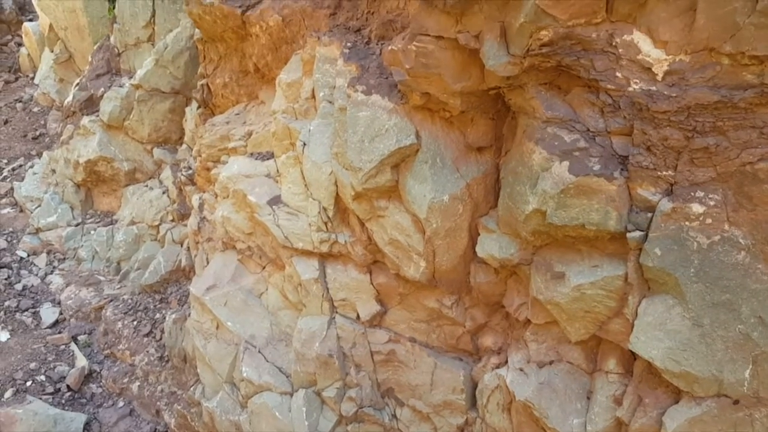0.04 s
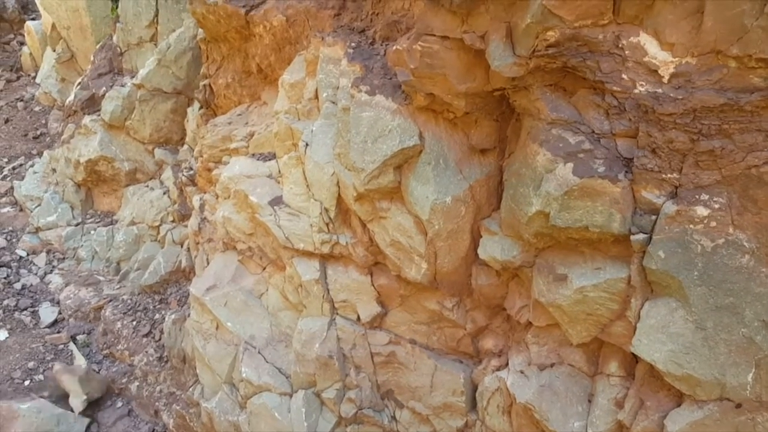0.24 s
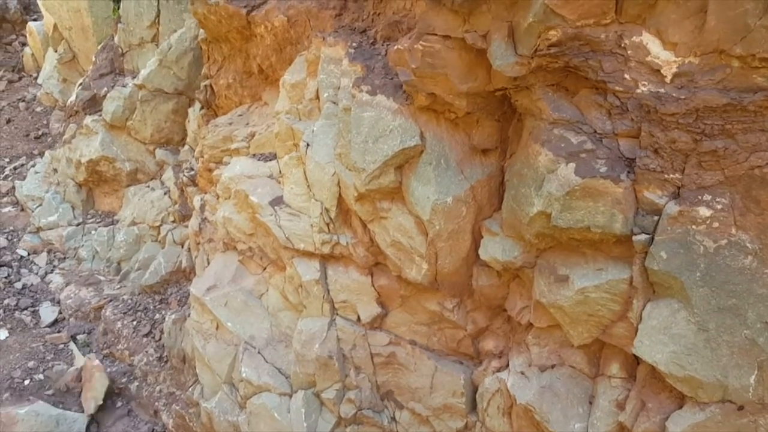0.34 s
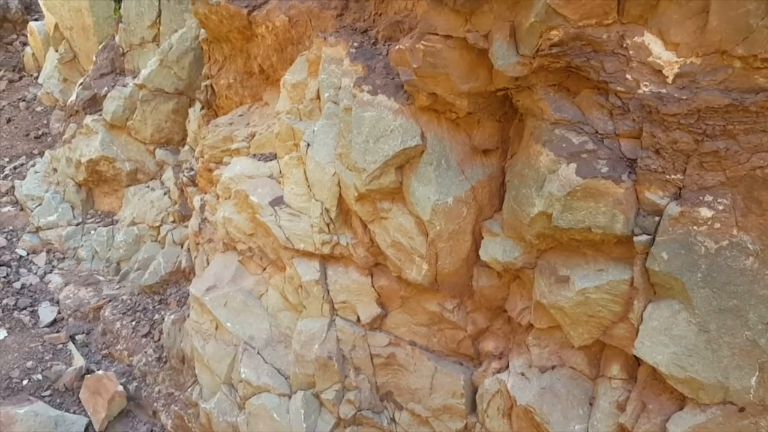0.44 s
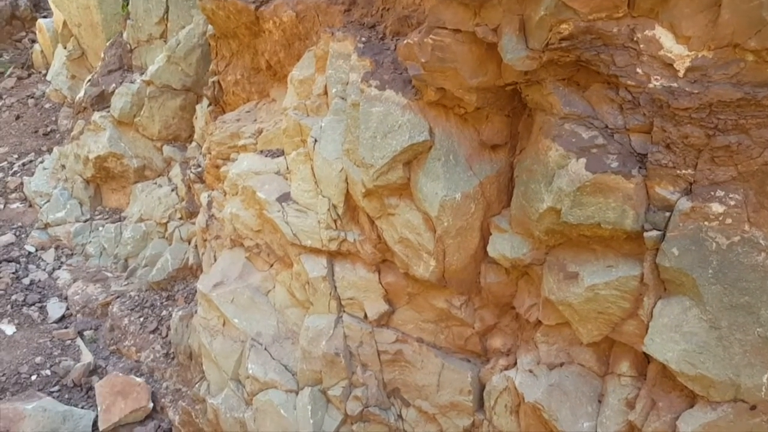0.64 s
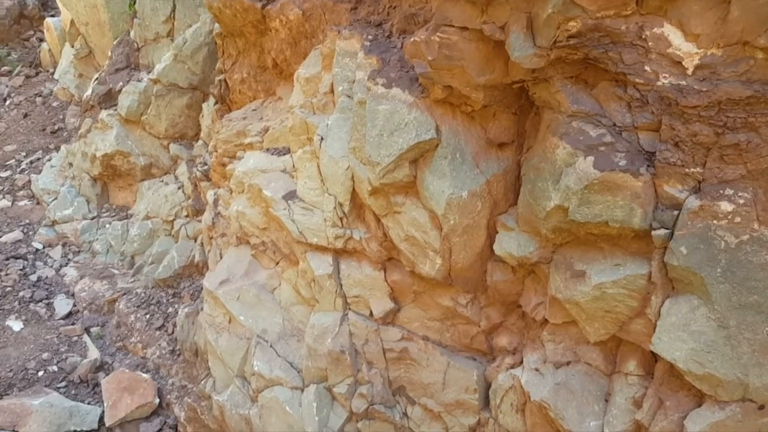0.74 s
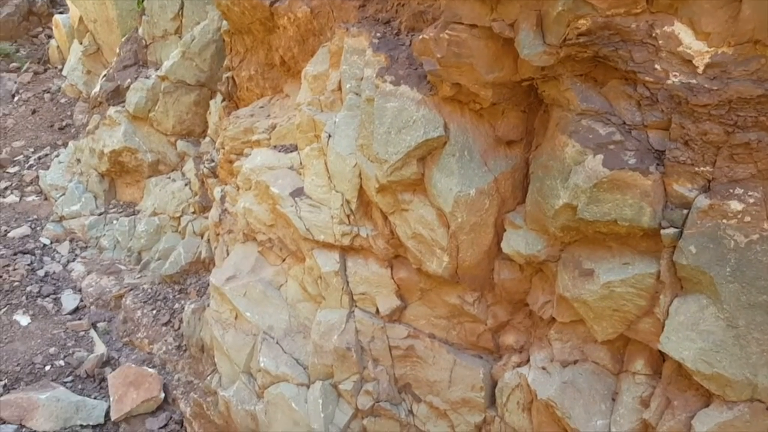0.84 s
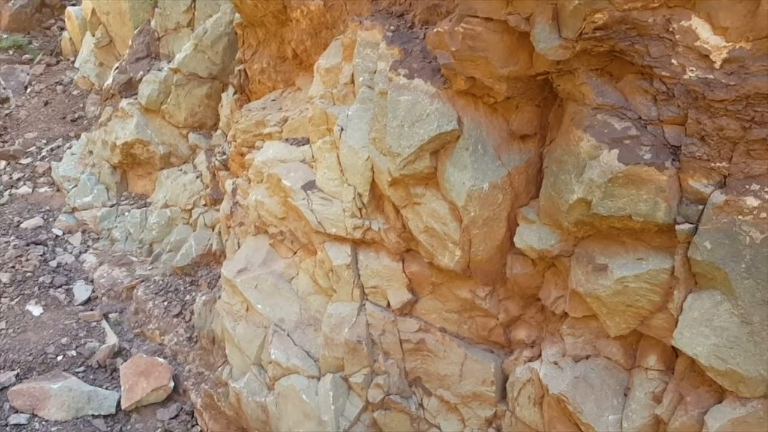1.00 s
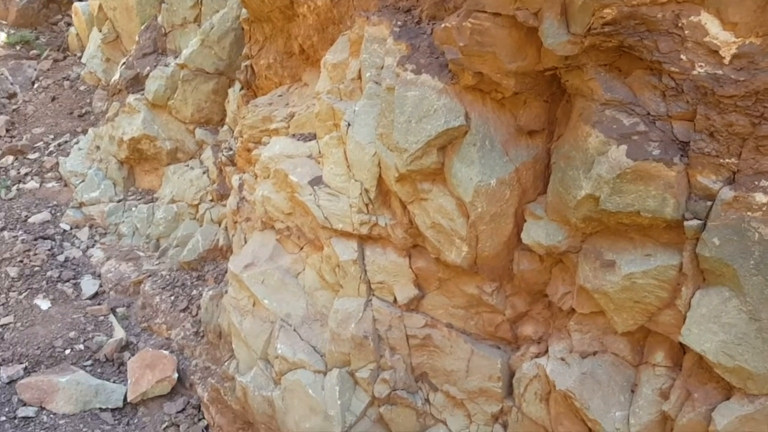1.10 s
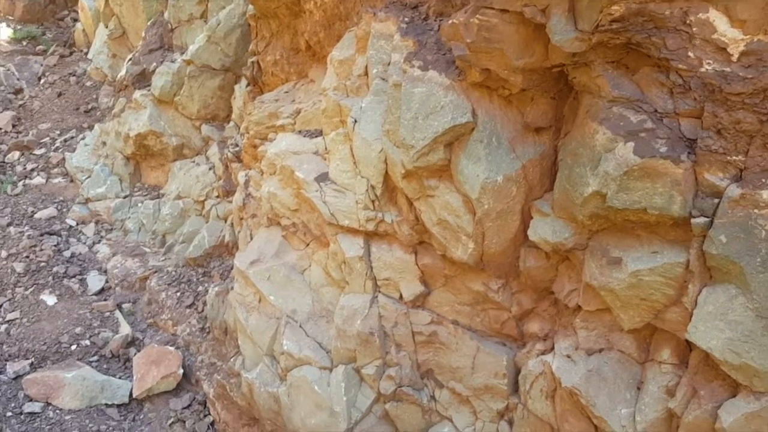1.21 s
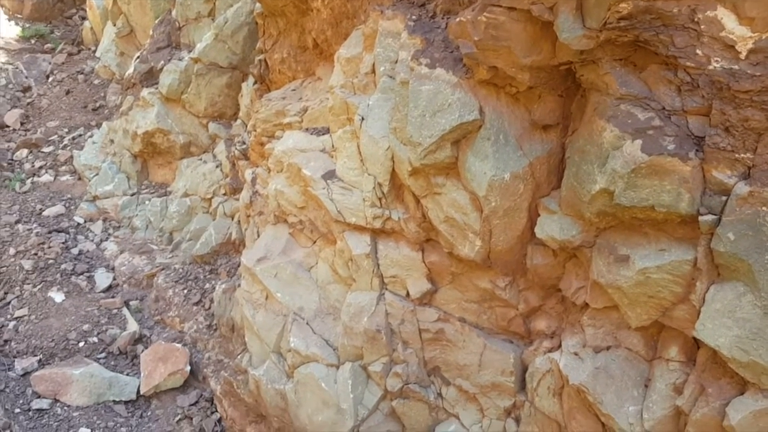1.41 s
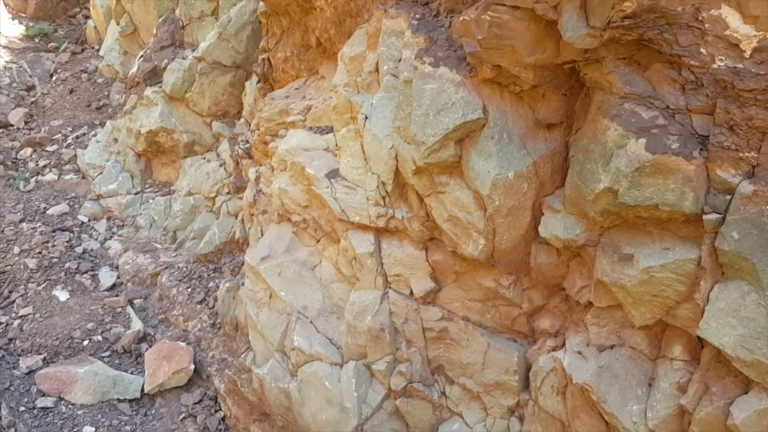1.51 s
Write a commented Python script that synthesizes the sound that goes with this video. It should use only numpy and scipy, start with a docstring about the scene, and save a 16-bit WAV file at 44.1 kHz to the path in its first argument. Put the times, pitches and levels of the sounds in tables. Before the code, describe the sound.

A stone lands on rock outdoors. Very faint air hiss until 0.2 s, then two hard, bright clacks 12 ms apart, with thud, grit crunch and a thin high chink, left of centre. Duller, softer knocks tumble over gravel from 0.33 to 0.62 s, strongest near 0.35, 0.46 and 0.62. Fine grains patter and fade; a soft cliff echo decays. Faint pebble ticks come around 1.06-1.17, 1.32 and 1.49 s.

```python
"""First there is only a faint hiss of air; then a tossed stone strikes another rock twice at a cliff's foot.
It tumbles over gravel and settles. In each contact filtered impulses excite decaying modes (clack, thud),
while a noise burst makes the crunch of grit. Noise responses scatter the sound off the rubble within
milliseconds, then return a soft cliff echo in a diffuse tail. Loose grains patter down, ever fainter."""
import sys
import numpy as np
from scipy import signal
from scipy.fft import rfft, irfft
from scipy.io import wavfile
from scipy.ndimage import uniform_filter1d

SR = 44100
rng = np.random.default_rng(int(sys.argv[2]) if len(sys.argv) > 2 else 0)


def master_out(mix):
    """Clip the mix to full scale and print it as 16-bit PCM to the path in sys.argv[1]."""
    frames = np.transpose(np.atleast_2d(mix))
    ceiling = np.clip(frames, -1, 1)
    pcm = np.round(ceiling * 32767).astype(np.int16)
    wavfile.write(sys.argv[1], SR, pcm)


N = 68355

# Colour of the outdoor air hiss: (frequency [Hz], relative level [dB])
AIR_SPECTRUM = [(20, -10), (50, -6), (110, -5), (220, -1), (350, -3), (500, -6.5), (1200, -9), (2000, -5.5),
                (2900, -6), (4200, -20), (6000, -25), (15000, -31)]
# Colour of the sound returned by the cliff: (frequency [Hz], gain [dB])
CLIFF_SPECTRUM = [(100, -6), (170, -3), (300, -14), (600, -3.5), (1000, -6.5), (1900, 0.5), (3000, -9),
                  (6000, -4), (14000, -8.5)]
# Colour of crushed and falling grains: (frequency [Hz], gain [dB])
GRIT_SPECTRUM = [(500, -7.5), (2000, 13), (4400, 4), (6000, 0), (7200, -2.5), (8200, -16), (10500, -16.5),
                 (11900, -5.5), (14000, -1), (15500, -15)]
# Colour of the rubble scatter, on both channels: (frequency [Hz], gain [dB])
RUBBLE_SPECTRUM = [(300, -1), (900, -2), (2000, 0), (4000, -0.5), (13000, -4)]
# Resonances of the stony ground: (frequency [Hz], level [dB], 60 dB decay time [s])
GROUND_MODES = [(198, -35, 0.011), (306, -18.5, 0.037), (413, -31.5, 0.022)]
# Thin high chink of the hardest blows: (frequency [Hz], level [dB], 60 dB decay time [s])
CHINK_MODES = [(12100, -37.5, 0.033), (11750, -31.5, .025), (13400, -37.5, .02), (14200, -38.5, .025),
               (14350, -35.5, .02)]
# Resonances of the stone: (frequency [Hz], level [dB], 60 dB decay time [s])
STONE_MODES = [(532, -37.5, 0.063), (811, -42.5, 0.049), (1183, -48, 0.026), (1282, -45.5, 0.11),
               (1706, -44, 0.02), (2090, -35, 0.02), (2550, -37.5, .05), (2826, -21.5, 0.013),
               (3640, -34, 0.014), (4123, -29.5, 0.024), (4338, -36, 0.048)]
# Colour of a clack: (frequency [Hz], gain [dB])
CLACK_SPECTRUM = [(30, -57.5), (100, -31.5), (400, -9.5), (650, -3), (1050, 2.5), (1900, 1.5), (3000, -5.5),
                  (3700, -3.5), (4800, 1.5), (6000, -7), (9000, -19), (16000, -25)]
# Contacts of the stone and of pebbles it unsettles:
# (time [s], clack level [dB], clack cutoff [Hz], ground thud level [dB], grit level [dB])
CONTACTS = [ (0.2, 13, 2280, 4, -8.5), (0.2124, 15.5, 3550, -2.5, -2), (0.3251, -12, 1190, -52, -58),
            (0.3393, -44, 4500, -40, -28), (.3510, -0.5, 670, -7, -17.5), (0.387, -15, 1010, -26.5, -65),
            (.4137, -20, 2480, -46, -35), (0.4388, -21.5, 2860, -55.5, -38.5),
            (0.4513, -19, 3900, -31.5, -27.5), (.4640, 0.5, 1134, -12.5, -42),
            (0.4923, -13.5, 1220, -44, -56), (.5128, -12, 1620, -26, -37.5),
            (.5340, -24.5, 1250, -30.5, -50), (0.5532, -26, 900, -30.5, -76),
            (0.564, -34, 2820, -52, -39.5), (.6160, -3, 678, -24.5, -36.5),
            (.7170, -48.5, 3018, -63, -47.5), (0.845, -46.5, 3124, -55, -47),
            (1.063, -26.5, 900, -43.5, -49.5), (1.1376, -22.5, 1100, -33, -48),
            (1.174, -22.5, 1100, -35, -63), (1.323, -39, 2160, -50.5, -72), (1.4850, -41, 2163, -43, -71)]

AIR_DB, AIR_LEFT_DB, AIR_SHARED_BELOW_HZ = -67, 2.5, 570  # left is raised and right lowered by AIR_LEFT_DB
TAIL_DB, TAIL_T60_S, TAIL_RIGHT_DB = -8.5, 0.33, -2  # near diffuse tail; right gain of the whole return
FAR_DB, FAR_T60_S = -22.5, 0.874  # faint return from farther away
ECHO_DB, ECHO_S, ECHO_WIDTH_S = -15, 0.069, 0.0047  # main face of the cliff
TRICKLE_PER_S, TRICKLE_DB, TRICKLE_FADE_DB_PER_S = 150, -36, 40  # grains knocked loose by the first blow
GRAIN_SPREAD_DB = 3.5  # standard deviation of falling grain levels
RUBBLE_DB, RUBBLE_SPREAD_S, RUBBLE_RISE_S = 2, 0.0058, 0.00035  # scatter from nearby stones
LATER_HITS_S, LATER_SCATTER_DB = 0.3, -1.5  # hits after this time sound more compact, with less scatter
THUD_SCATTER_DB = -5  # part of the thud that returns from the rubble
GRIT_DECAY_S = 0.00083  # time constant of a crunch
CHINK_FULL_DB, CHINK_GROWTH = 15.5, 2.1  # clack level [dB] of a full chink; dB of chink per dB of clack
LEFT_LEAD_S, RIGHT_CLACK_DB, RIGHT_THUD_DB = 0.00027, -12, -1.5
STOPBAND_HZ = 16500  # attenuation reaches 60 dB here


def from_db(db):
    """A level in decibels is twenty times the logarithm of the amplitude gain."""
    return 10 ** (np.asarray(db) / 20)


def unit_energy(x):
    """Energy is the sum of squared amplitudes; each channel is scaled to 1."""
    return x / np.sqrt(np.sum(x ** 2, axis=-1, keepdims=True) + 1e-20)


def convolve(x, response):
    """Linear superposition: every sample launches a scaled response; the input length is kept."""
    return signal.fftconvolve(np.atleast_2d(x), response, axes=-1)[:, :np.shape(x)[-1]]


def colour(x, points):
    """Minimum-phase filtering: folding the cepstrum gives a spectrum its causal response."""
    hz, db = np.transpose(points)
    size = 4096
    grid = np.maximum(np.fft.rfftfreq(size, 1 / SR), 1)
    gain_db = np.interp(np.log(grid), np.log(hz), db)
    cepstrum = irfft(np.log(from_db(gain_db)))
    folded = np.r_[cepstrum[0], 2 * cepstrum[1:size // 2]]
    response = irfft(np.exp(rfft(folded, size)))
    return convolve(x, response[None])


def low_pass(x, hz, order):
    """Butterworth low-pass: a maximally flat passband below the cutoff."""
    return signal.sosfilt(signal.butter(order, hz, fs=SR, output="sos"), x)


def ring(x, modes):
    """Modal resonance: an impulse starts each exponentially damped cosine at its crest."""
    out = 0
    for hz, db, t60 in modes:
        radius = from_db(-60 / (t60 * SR))  # decay per sample
        angle = 2 * np.pi * hz / SR
        zeros = [1, -radius * np.cos(angle)]
        poles = [1, -2 * radius * np.cos(angle), radius ** 2]
        out = out + from_db(db) * signal.lfilter(zeros, poles, x)
    return out


def even_burst(shape, channels):
    """Spectral whitening: noise under an envelope is evened so no frequency stands out; energy 1."""
    x = rng.standard_normal((channels, len(shape))) * shape
    for _ in range(4):
        phase = np.angle(rfft(x))
        x = irfft(np.exp(1j * phase), len(shape))
        local_power = uniform_filter1d(x ** 2, size=60)
        x = x * shape / np.sqrt(local_power + 1e-12)
    return unit_energy(x)


def add(track, s, sound):
    """Superposition: a short sound is summed into the track at time s."""
    start = int(s * SR)
    track[:, start:start + sound.shape[1]] += sound[:, :N - start]


def from_left(x, right_db):
    """Time and level differences: a source on the left reaches the right microphone later and weaker."""
    x = np.ravel(x)
    t = np.arange(len(x)) / SR
    delayed = np.interp(t - LEFT_LEAD_S, t, x)
    return np.array([x, from_db(right_db) * delayed])


def air():
    """Partial coherence: steady noise is alike on both sides only in the bass."""
    mid, side = rng.standard_normal((2, N))
    side = side - low_pass(side, AIR_SHARED_BELOW_HZ, order=1)
    hiss = colour(np.array([mid + side, mid - side]), AIR_SPECTRUM)
    hiss = unit_energy(hiss) * np.sqrt(N)  # RMS 1
    return from_db([[AIR_DB + AIR_LEFT_DB], [AIR_DB - AIR_LEFT_DB]]) * hiss


def cliff(x, rise_s=0.004):
    """Diffuse reflection: a smeared echo from the rock face within near and far exponential tails."""
    t = np.arange(SR) / SR
    power = (from_db(ECHO_DB) * unit_energy(np.exp(-np.abs(t - ECHO_S) / ECHO_WIDTH_S))) ** 2
    for db, t60 in ((TAIL_DB, TAIL_T60_S), (FAR_DB, FAR_T60_S)):
        tail = (1 - np.exp(-t / rise_s)) * np.exp(-np.log(1000) * t / t60)
        power = power + (from_db(db) * unit_energy(tail)) ** 2
    response = rng.standard_normal((2, len(t))) * np.sqrt(power)
    return from_db([[0], [TAIL_RIGHT_DB]]) * colour(convolve(x, response), CLIFF_SPECTRUM)


def rubble(x, channels):
    """Multiple scattering: dense reflections from nearby stones in milliseconds, redrawn at each call."""
    t = np.arange(SR // 20) / SR
    shape = (1 - np.exp(-t / RUBBLE_RISE_S)) * np.exp(-t / RUBBLE_SPREAD_S)
    return convolve(x, even_burst(shape, channels))


def trickle():
    """Random impacts at a constant mean rate: loose grains patter after the first blow, ever fainter."""
    age = np.arange(N) / SR - CONTACTS[0][0]
    falls = (rng.random(N) < TRICKLE_PER_S / SR) & (age > 0)
    level_db = TRICKLE_DB - TRICKLE_FADE_DB_PER_S * age
    sizes = from_db(level_db + GRAIN_SPREAD_DB * rng.standard_normal(N))
    return colour(rubble(falls * sizes, channels=2), GRIT_SPECTRUM)


def crunch(t):
    """Granular fracture: crushed grains sound as a short, exponentially decaying noise burst."""
    return colour(even_burst(np.exp(-t / GRIT_DECAY_S), channels=1), GRIT_SPECTRUM)


def ground(push, low_cut_hz=120, high_cut_hz=520):
    """Damped resonance of the ground, band-limited to a dull thud with little deep bass."""
    band = signal.butter(2, [low_cut_hz, high_cut_hz], "band", fs=SR, output="sos")
    return signal.sosfilt(band, ring(push, GROUND_MODES))


def chink(pulse, clack_db):
    """Nonlinear excitation: high modes grow faster in level than the clack."""
    return from_db(CHINK_GROWTH * (clack_db - CHINK_FULL_DB)) * ring(pulse, CHINK_MODES)


def stone(pulse, cutoff_hz):
    """Contact force and modal ring: a cushioned contact gives a lower cutoff and a duller clack."""
    force = low_pass(pulse, cutoff_hz, order=4)
    return colour(force + ring(force, STONE_MODES), CLACK_SPECTRUM)


def contacts():
    """Impact radiation: clack, chink, crunch and thud are heard directly and off the rubble."""
    out, radiated = np.zeros((2, N)), np.zeros((1, N))
    t = np.arange(SR // 10) / SR
    pulse = signal.unit_impulse(len(t))
    for s, clack_db, cutoff_hz, thud_db, grit_db in CONTACTS:
        clack = from_db(clack_db) * stone(pulse, cutoff_hz)
        strike = clack + chink(pulse, clack_db) + from_db(grit_db) * crunch(t)
        thud = from_db(thud_db) * ground(pulse)

        scatter_db = RUBBLE_DB + LATER_SCATTER_DB * (s > LATER_HITS_S)
        scatter = from_db(scatter_db) * colour(rubble(strike, channels=2), RUBBLE_SPECTRUM)
        add(out, s, from_left(strike, RIGHT_CLACK_DB) + scatter)

        thud_scatter = from_db(THUD_SCATTER_DB) * rubble(thud, channels=1)
        add(out, s, from_left(thud + thud_scatter, RIGHT_THUD_DB))
        add(radiated, s, (strike + thud).reshape(1, -1))  # what reaches the cliff
    return out, radiated


def scene():
    """Superposition of air, cliff return, grains and the stone, which lands to the left."""
    near, radiated = contacts()
    return near + cliff(radiated) + trickle() + air()


def record(dry):
    """Band limitation: a steep Chebyshev low-pass cuts the top of the spectrum."""
    return signal.sosfilt(signal.cheby2(14, 60, STOPBAND_HZ, fs=SR, output="sos"), dry)


dry = scene()
out = record(dry)
master_out(out)
```